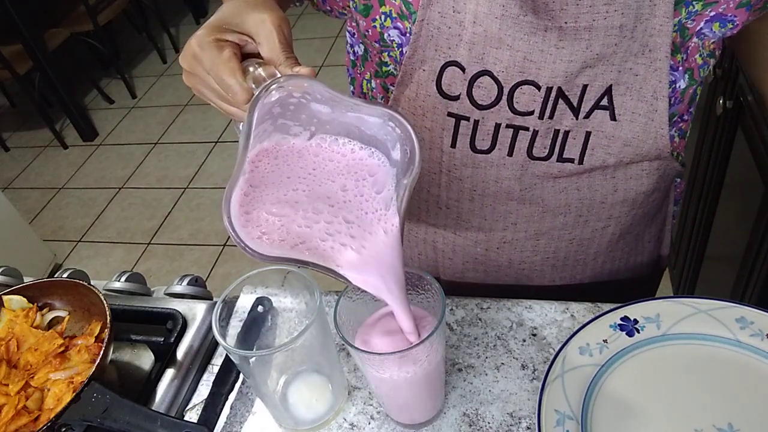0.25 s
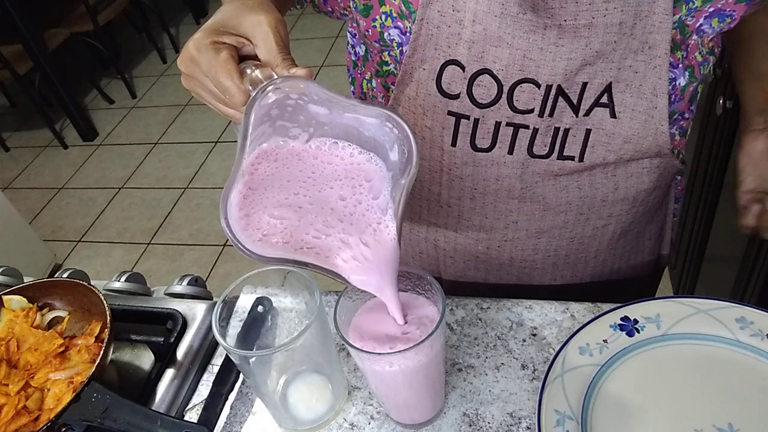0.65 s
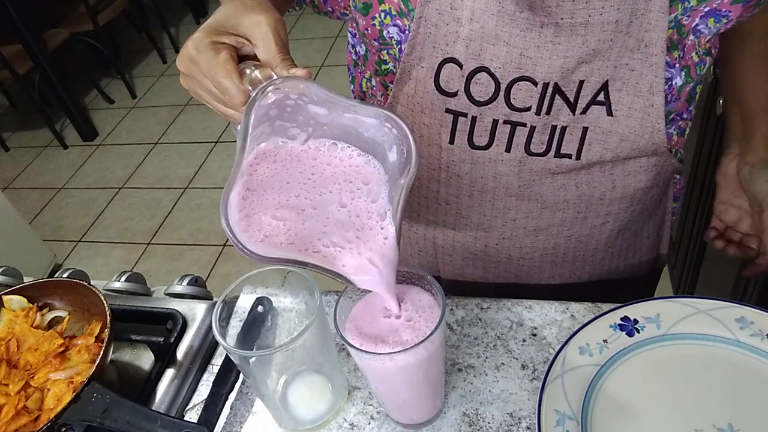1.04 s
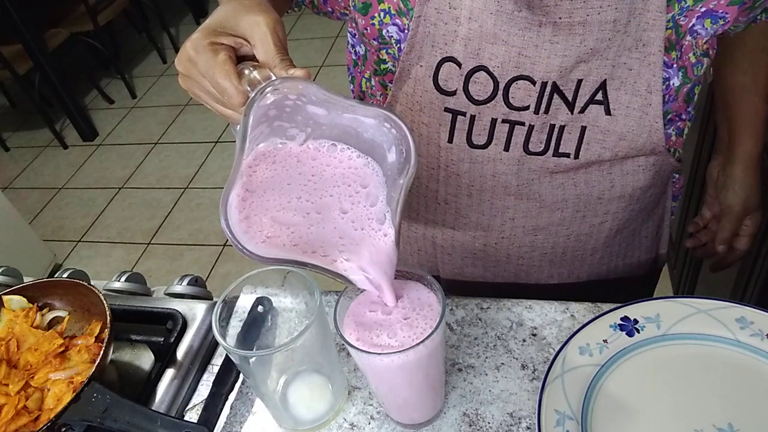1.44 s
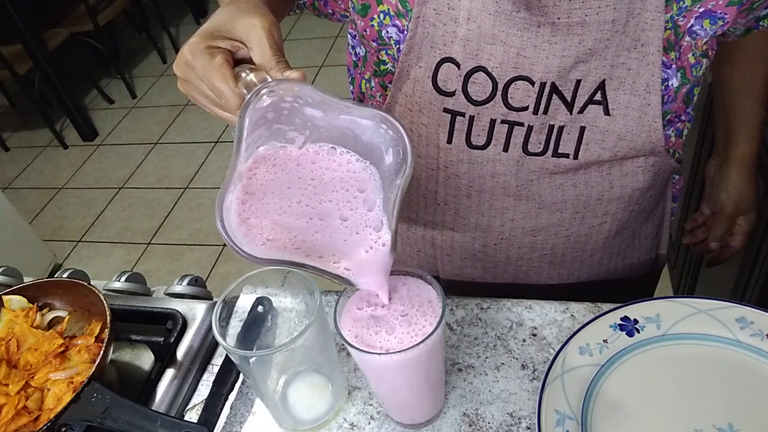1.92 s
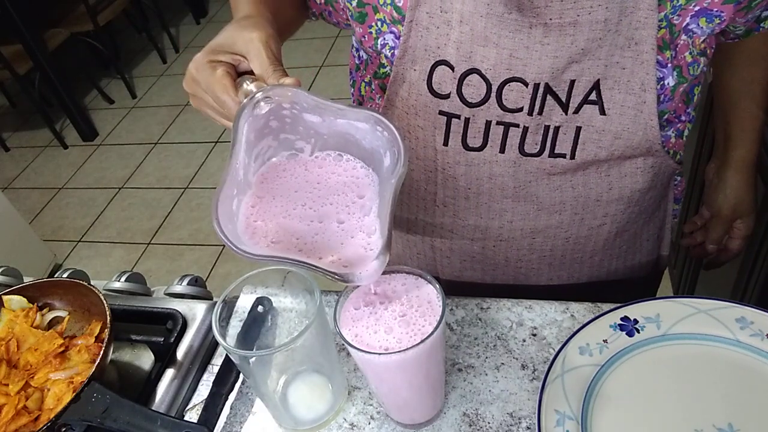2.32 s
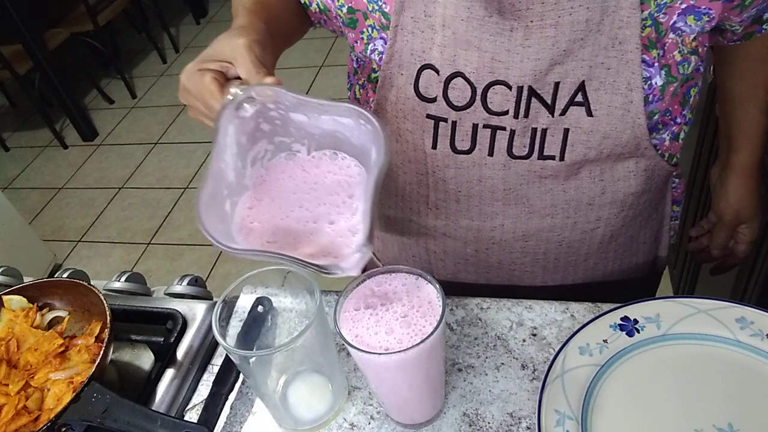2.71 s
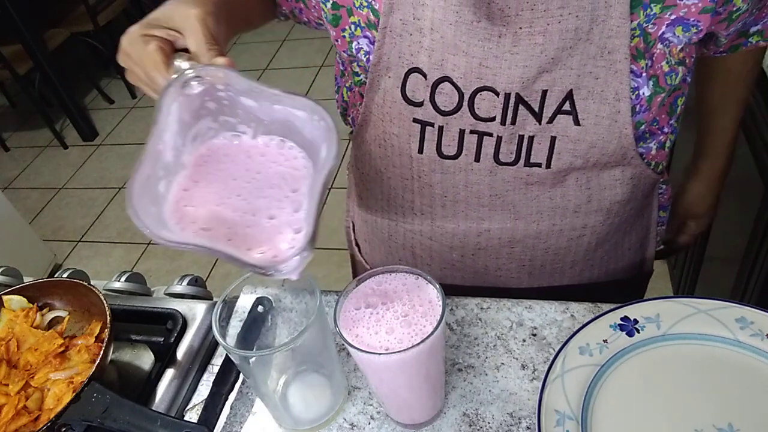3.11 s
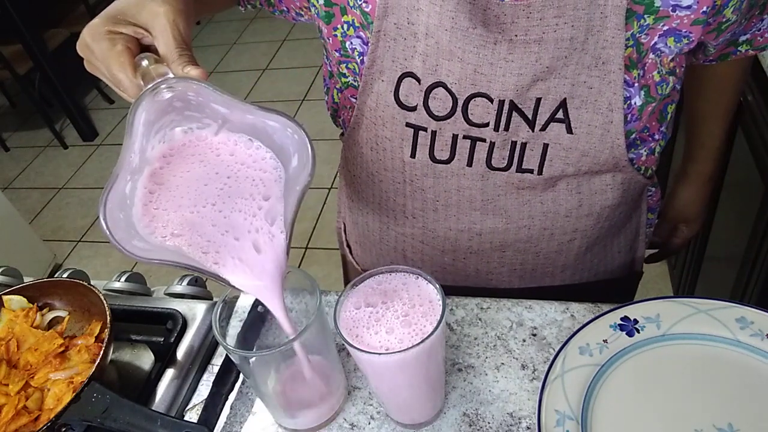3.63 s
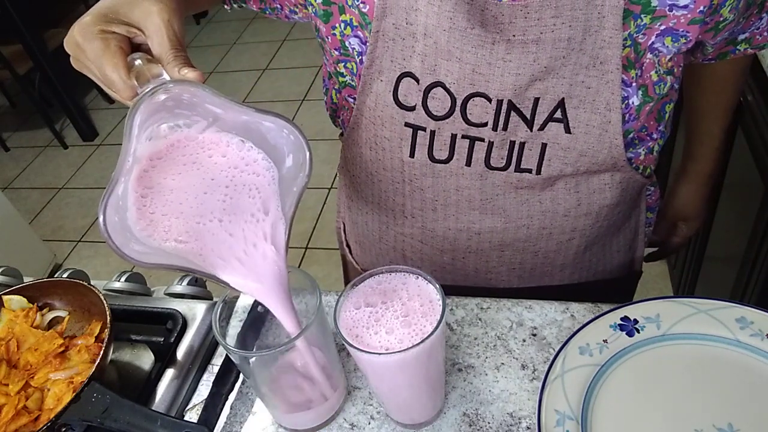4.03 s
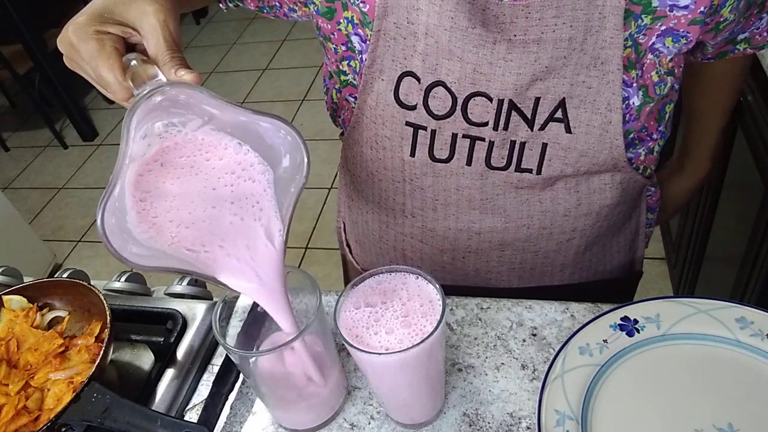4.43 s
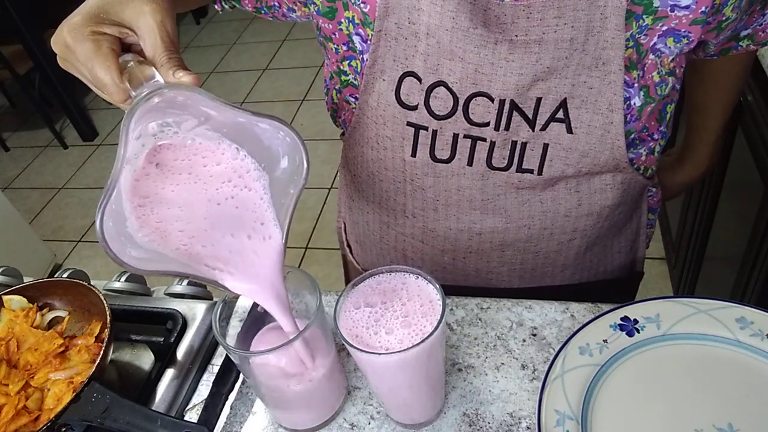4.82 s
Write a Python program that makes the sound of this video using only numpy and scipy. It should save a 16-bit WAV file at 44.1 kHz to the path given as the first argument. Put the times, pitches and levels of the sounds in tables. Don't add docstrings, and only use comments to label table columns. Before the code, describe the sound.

Over a steady beating appliance hum and faint ticking, a gentle foamy pour fades, plastic knocks glass, and a second pour starts with hollow plops.

```python
import sys
import numpy as np
from scipy import signal
from scipy.io import wavfile
from scipy.ndimage import uniform_filter1d

SR = 44100
rng = np.random.default_rng(int(sys.argv[2]) if len(sys.argv) > 2 else 0)


def ratio(d):
    e = np.asarray(d, float) / 20
    return 10 ** e


def materialize(psi):
    bounded = np.clip(np.atleast_2d(psi).T, -1, 1)
    quanta = np.round(bounded * 32767).astype(np.int16)
    wavfile.write(sys.argv[1], SR, quanta)


N = 222925

# (time [s], flow level [dB], air column [Hz])
POUR = [(0, -61, 910), (.1, -66, 873), (.2, -67, 865), (.4, -75, 830), (1.2, -76.5, 980),
        (1.75, -86.5, 920), (3.4, -78, 790), (3.6, -72, 755), (3.95, -74, 960), (4.1, -71.5, 978),
        (4.17, -67.5, 690), (4.3, -85, 713), (5.05, -76, 830)]
USUAL_FLOW_DB = -72
FIZZ_DB, FIZZ_SHARE, WASH_DB, WASH_SHARE = -75.5, 0.16, -74.5, 0.33
# (time [s], level [dB])
SLOSHES = [
    (2.18, -82),
    (2.96, -80.5),
]
SLOSH_S = 0.17
# (time [s], cavity note [dB], cavity pitch [Hz], smack [dB], slap [dB])
SPLATS = [(3.6683, -54.5, 1720, -54, -50.5), (3.736, -48.5, 1830, -50, -77), (3.806, -49, 1285, -54, -68),
          (3.866, -54.5, 1250, -55, -66), (3.9022, -37.5, 1760, -45.5, -46.5),
          (3.948, -51, 1720, -51, -61.5), (4.1318, -58, 1260, -59, -76), (4.28, -67, 1290, -64, -65),
          (4.2947, -69, 1150, -58.5, -73), (4.323, -51.5, 718, -60.5, -83), (4.521, -41.5, 800, -42, -43.5),
          (4.683, -63, 1170, -52, -61.5)]
CAVITY_CYCLES = 44
SPRAY_DB, CLICK_DB = -5.5, 13
BLOB_PAN_DB, BLOB_LAG_S = 2.2, .0001
# (time [s], level [dB], pitch [Hz])
BUBBLES = [
    (0.0716, -68, 1300),
    (0.171, -53.5, 1300),
    (0.1997, -58, 1330),
    (0.2297, -60, 1290),
    (3.915, -46, 1350),
    (4.113, -59, 1890),
]
# (time [s], slap level [dB], spray level [dB])
DROPLETS = [(0.8794, -76, -67.5), (1.55, -69, -67.5), (1.5664, -73, -74), (3.6812, -51.5, -43),
            (3.6675, -64, -57), (5.6, -70, -47), (4.6833, -76, -62), (4.177, -67, -73), (4.1905, -68, -69)]
# (frequency [Hz], level [dB], t60 [s])
GLASS_HOLLOW = [(1170, 0, 0.038), (1330, -9, 0.048), (1760, -8.5, 0.021), (2260, 0, 0.022),
                (2670, -4, 0.017)]
# (time [s], soft mode [dB], upper modes [dB], low body [dB], left minus right [dB])
KNOCKS = [
    (2.1096, -33.5, -47, -39.5, -2.5),
    (2.1143, -56, -50, -56, 13.5),
    (3.3977, -46, -63.5, -48.5, 3),
]
KNOCK_STIFF_DB = -5.5
# (time [s], stiff mode [dB], low body [dB])
TOUCHES = [(2.1814, -47, -50), (2.389, -59, -64), (2.7934, -51.5, -67), (2.834, -42.5, -53.5),
           (2.8806, -51, -58), (2.8996, -55, -60), (2.9436, -57, -56)]
TOUCH_SOFT_DB, TOUCH_UPPER_DB, TOUCH_PAN_DB = -18, -16, -2
# (frequency [Hz], level [dB], t60 [s])
JAR_STIFF = [(1275, 0, 0.043)]
JAR_SOFT = [(1133, 0, 0.042)]
JAR_UPPER = [(2160, 0.5, 0.072), (2052, 0.5, 0.062), (2580, -1, 0.048), (2527, -5, 0.053),
             (3547, -22, 0.18), (4930, -20, 0.15), (6000, -18, .05), (7849, -25, .07)]
JAR_LOW = [(529.4, 5, 0.055), (600, -13, 0.3), (835, 5, 0.026)]
# (time [s], peak level [dB], pitch [Hz])
THUMPS = [(2.111, -35.5, 360), (3.401, -37.5, 293), (3.402, -51, 400), (2.111, -36.5, 270),
          (3.404, -43.5, 600), (3.707, -39, 150), (3.7132, -37, 241), (3.714, -39, 290), (3.727, -33, 239),
          (3.717, -43.5, 337), (3.72, -49, 600), (3.903, -46, 602), (3.917, -50, 634)]
# (frequency [Hz], level [dB], t60 [s])
EMPTY_GLASS = (3.405, -71, [(1960, 0, .45)])
# (frequency [Hz], scraped level [dB], tapped level [dB], t60 [s])
RIM = [(4850, -10, -9, .08), (5850, 0, 0, .065), (7830, -16, -10, .1), (8600, -14, -8, .04),
       (11850, -3, -7, .045), (13200, -3, -10, .07), (14500, -20, -7, .04)]
# (time [s], level [dB])
SCRAPE = [(2.75, -140), (2.8, -101), (2.93, -98), (3.04, -92), (3.09, -95), (3.21, -98), (3.3, -140)]
# (time [s], level [dB])
RIM_TAP = (3.101, -63)
# (time [s], peak level [dB])
TICKS = [(0.0493, -64), (0.184, -61), (0.3147, -61), (0.4643, -62.5), (0.621, -62), (1.0211, -69),
         (1.3034, -69), (1.4311, -62), (1.7005, -64), (1.8133, -65), (1.9614, -64), (2.0931, -64),
         (2.2413, -61), (2.3735, -63), (2.5311, -65), (2.6653, -65), (2.8938, -64), (3.0514, -63),
         (4.0392, -61), (4.3146, -64), (4.4638, -65), (4.6099, -62), (4.7636, -65)]
# (time [s], speed [turns/s])
FAN = [(0, 28.971), (.337, 29.568), (.673, 28.815), (1.01, 29.366), (1.347, 29.387), (1.683, 29.726),
       (2.02, 29.796), (2.357, 29.511), (2.693, 29.518), (3.03, 29.236), (3.367, 29.643), (3.703, 29.512),
       (4.04, 28.911), (4.377, 29.51), (4.713, 29.655), (5.05, 29.922)]
# (multiple of shaft speed, level [dB], left minus right [dB], speed-up slope [dB per turn/s])
FAN_ORDERS = [(5, -54, 2, -5.), (2, -62.5, 5.5, 4), (4, -62, 0.5, -5.5)]
USUAL_SPEED = 29.45
COMPRESSOR_SPEED, FAN_LEAD = 29.032, .276
# (multiple of speed, level [dB], left minus right [dB])
COMPRESSOR_ORDERS = [(2, -65.5, 4.5), (4, -57.5, 1.5)]
# each [Hz], then the level
# of each [dB]
PAIR_HZ = (295.01, 296.22)
PAIR_DB = (-67.5, -64.5)
PAIR_IN_STEP_S, PAIR_PAN_DB = .479, -1
# (frequency [Hz], level [dB], lead on the compressor [turns])
SMALL_MOTOR = (59.234, -70.5, .516)
# (frequency [Hz], level [dB], left minus right [dB])
STEADY = [(88.5, -66, .2), (173.7, -68, 1.5), (196.7, -59, 3.2), (218.3, -63, 4.1), (694.4, -77, -4)]
# (frequency [Hz], level [dB per Hz])
AIR = [(15, -29), (25, -19.5), (91, -12.5), (148, -2), (210, -11), (260, -10), (314, -10.5), (434, -17.5),
       (705, -19), (1030, -26), (1350, -25.5), (1500, -28.5), (2430, -37), (6590, -48.5), (15600, -72)]
AIR_DB = -54.5
# (frequency [Hz], likeness [0..1])
LIKENESS = [(60, 1), (200, 0.79), (400, 0.95), (1000, 0.45), (3000, 0.22), (8000, 0.088), (15000, .45)]
AIR_LAG_S = 0.00039
# (time [s], level [dB])
DRAUGHT = [(0, 2), (.8, 1), (1.3, 1), (1.75, -3.5), (2.1, -0.5), (3.0, .5), (3.4, -4.5), (3.8, 3),
           (4.25, -3), (4.6, 1), (5.05, -1.5)]
# (frequency [Hz], t60 [s])
KITCHEN = [(300, 1), (1500, 0.44), (5000, 0.64), (12000, 0.45)]
EDGE_HZ = 15830


def pour():
    gurgle_db, column_hz = along(POUR)
    lump_size = ratio(2.2 * np.minimum(rng.exponential(1, N), 3))
    lumps = lump_size * (rng.random(N) < 900 / SR) * rng.choice([-1, 1], N)
    first = resonate(resonate(lumps, column_hz, 70), column_hz, 150)
    second = resonate(resonate(lumps, 1.45 * column_hz, 260), 1.42 * column_hz, 400)
    gurgle = ratio(gurgle_db) * (evened(first) + 0.28 * evened(second)) * sides(0.45)
    pops = ratio(1.75 * rng.exponential(1, (2, N))) * rng.standard_normal((2, N))
    treble = signal.butter(3, 9500, "highpass", fs=SR, output="sos")
    fizz = evened(signal.sosfilt(treble, pops))
    return gurgle + ratio(FIZZ_DB + FIZZ_SHARE * (gurgle_db - USUAL_FLOW_DB)) * fizz


def stream():
    size = ratio(2.0 * np.minimum(rng.exponential(1, (2, N)), 5))
    grains = size * rng.standard_normal((2, N)) * (rng.random((2, N)) < .08)
    dull = signal.butter(2, [350, 3200], "bandpass", fs=SR, output="sos")
    flow = ratio(WASH_DB + WASH_SHARE * (along(POUR)[0] - USUAL_FLOW_DB))
    t = np.arange(N) / SR
    slosh = sum(ratio(db) * np.exp(-((t - s) / SLOSH_S) ** 2) for s, db in SLOSHES)
    return (flow + slosh) * evened(signal.sosfilt(dull, grains))


def splats():
    out = np.zeros((2, N))

    def place(s, sound):
        add(out, s, sound, BLOB_PAN_DB, lag_s=BLOB_LAG_S)

    click_band = signal.butter(2, [1500, 12000], "bandpass", fs=SR, output="sos")
    click = signal.sosfilt(click_band, signal.unit_impulse(256))
    for s, db, hz in BUBBLES:
        place(s, ratio(db) * ring([(hz, -1, .035), (0.85 * hz, -4, .03)], rise_s=0.00098))
    for s, db, hz, smack_db, slap_db in SPLATS:
        place(s, ratio(db + .5) * ring([(hz, 0, CAVITY_CYCLES / hz)], rise_s=0.0012))
        place(s + .0005, ratio(slap_db + CLICK_DB) * click)
        struck = ratio(rng.uniform(-1, 0, len(GLASS_HOLLOW)))
        hollow = sum(g * ring([mode], rise_s=0.0028)[:2048] for g, mode in zip(struck, GLASS_HOLLOW))
        smack = burst(750, 2730, 0.049, same=0.37, snap=0.)
        place(s, ratio(smack_db - 3.0) * smack + ratio(smack_db - 4.0) * hollow)
    blob_sprays = [(s, slap_db, slap_db + SPRAY_DB) for s, _, _, _, slap_db in SPLATS]
    for s, slap_db, spray_db in DROPLETS + blob_sprays:
        slap = burst(2900, 7200, 0.021, same=0.13, snap=0.26)
        spray = burst(9700, 14800, 0.036)
        place(s, ratio(slap_db) * slap + ratio(spray_db) * spray)
    return out


def jar():
    out = np.zeros((2, N))
    bodies = [ring(modes, rise_s=0.003) for modes in (JAR_STIFF, JAR_SOFT, JAR_UPPER, JAR_LOW)]
    blows = [(s, soft + KNOCK_STIFF_DB, soft, upper, low, pan) for s, soft, upper, low, pan in KNOCKS]
    blows += [(s, stiff, stiff + TOUCH_SOFT_DB, stiff + TOUCH_UPPER_DB, low, TOUCH_PAN_DB)
              for s, stiff, low in TOUCHES]
    for s, stiff, soft, upper, low, pan_db in blows:
        levels_db = np.array([stiff, soft, upper, low])
        add(out, s - .001, ratio(levels_db - 2.0) @ bodies, pan_db, lag_s=.00005)
        add(out, s, ratio(soft - 11) * burst(250, 1200, .04, same=.8, snap=0.), pan_db)
        add(out, s, ratio(upper - 27) * burst(2600, 8500, 0.035, snap=0.), pan_db)
    for s, db, hz in THUMPS:
        add(out, s, ratio(db) * ring([(hz, 0, .045)], rise_s=.003))
    s, db, modes = EMPTY_GLASS
    add(out, s, ratio(db) * ring(modes))
    return out


def rim():
    slips = ratio(along(SCRAPE)[0]) * (rng.random(N) < 4000 / SR) * rng.standard_normal(N)
    tap_s, tap_db = RIM_TAP
    tap = ratio(tap_db) * (np.arange(N) == round(tap_s * SR))
    modes = []
    for hz, scraped_db, tapped_db, t60 in RIM:
        force = ratio(scraped_db) * slips + ratio(tapped_db) * tap
        modes.append(signal.oaconvolve(force, ring([(hz, 0, t60)], rise_s=.0006))[:N])
    angle = rng.uniform(.3, 1.2, len(RIM))
    out = np.array([np.cos(angle), np.sin(angle)]) @ modes
    add(out, tap_s, ratio(tap_db - 5.0) * burst(1800, 14500, .02))
    return out


def ticks():
    out = np.zeros((2, N))
    for s, db in TICKS:
        add(out, s, ratio(db - 6.5) * burst(10500, 12600, 0.026), .6)
    return out


def hum():
    t = np.arange(N) / SR
    speed = along(FAN)[0]
    turns = np.cumsum(speed) / SR + FAN_LEAD
    fan = sum(sides(pan) * ratio(db + slope_db * (speed - USUAL_SPEED)) * np.sin(2 * np.pi * k * turns)
              for k, db, pan, slope_db in FAN_ORDERS)
    compressor = sum(sides(pan) * ratio(db) * np.sin(2 * np.pi * k * COMPRESSOR_SPEED * t)
                     for k, db, pan in COMPRESSOR_ORDERS)
    pair = sum(ratio(db) * np.sin(2 * np.pi * hz * (t - PAIR_IN_STEP_S)) for hz, db in zip(PAIR_HZ, PAIR_DB))
    lines = sum(sides(pan) * ratio(db) * np.sin(2 * np.pi * (hz * t + rng.random())) for hz, db, pan in STEADY)
    motor_hz, motor_db, motor_lead = SMALL_MOTOR
    motor = ratio(motor_db) * np.sin(2 * np.pi * (motor_hz * t + motor_lead))
    return np.sqrt(2) * (motor + fan + compressor + sides(PAIR_PAN_DB) * pair + lines)


def air():
    frames, hz = N // 512 + 5, np.fft.rfftfreq(2048, 1 / SR)
    a, b, c, d, patches = rng.standard_normal((frames, 1025, 5)).T
    patches = uniform_filter1d(patches, size=20, axis=0)
    patches = evened(uniform_filter1d(patches, size=8, axis=1))
    same = np.clip(read(LIKENESS, hz), 0, 1)[:, None]
    right = a + 1j * b
    late = np.exp(-2j * np.pi * hz * AIR_LAG_S)[:, None]
    left = same * late * right + np.sqrt(1 - same ** 2) * (c + 1j * d)
    frame_s = (np.arange(frames) - 1) * 512 / SR
    draught_db = np.interp(frame_s, *np.transpose(DRAUGHT)) / (1 + (hz[:, None] / 700) ** 2)
    z = np.array([left, right]) * ratio(read(AIR, hz)[:, None] + 0.6 * patches + draught_db)
    sound = signal.istft(z, nperseg=2048, noverlap=1536)[1][:, :N]
    return sides(0.25) * ratio(AIR_DB) * evened(sound)


def kitchen(x):
    taps = np.zeros((2, SR // 2))
    at = np.arange(100, SR // 2 - 20, 20)
    at = at + rng.integers(0, 20, (2, len(at)))
    np.put_along_axis(taps, at, rng.choice([-1., 1.], at.shape), 1)
    hz, t, z = signal.stft(taps, SR, nperseg=256)
    decay = ratio(-60 * t / read(KITCHEN, hz)[:, None])
    tail = signal.istft(z * decay, SR, nperseg=256)[1]
    tail = tail / np.linalg.norm(tail[0])
    return signal.fftconvolve(x.mean(0)[None], tail, axes=1)[:, :N]


def ring(modes, rise_s=0.0012):
    t = np.arange(SR // 3) / SR
    sound = sum((-1) ** k * ratio(db - 60 * t / t60) * np.sin(2 * np.pi * hz * t)
                for k, (hz, db, t60) in enumerate(modes))
    return sound * np.sin(np.pi / 2 * np.minimum(t / rise_s, 1)) ** 2


def burst(lo_hz, hi_hz, t60, same=0.043, snap=0.74):
    band = signal.butter(2, [lo_hz, min(hi_hz, SR / 2 - 1)], "bandpass", fs=SR, output="sos")
    a, b = rng.standard_normal((2, 2048))
    noise = np.array([a, same * a + np.sqrt(1 - min(same, 1) ** 2) * b])
    t = np.arange(2048) / SR
    return evened(signal.sosfilt(band, noise)) * (ratio(-60 * t / t60) + snap * np.exp(-t / 0.00032))


def resonate(x, hz, width_hz):
    turn = np.exp(2j * np.pi * np.cumsum(hz * np.ones(x.shape[-1])) / SR)
    r = np.exp(-np.pi * width_hz / SR)
    return 2 * (turn * signal.lfilter([1 - r], [1, -r], x / turn)).real


def add(mix, s, sound, pan_db=0., lag_s=0.):
    waves = sound * np.ones((2, 1))
    for side, late, db, wave in zip(mix, (lag_s, 0), (pan_db / 2, -pan_db / 2), waves):
        part = side[round((s + late) * SR):][:len(wave)]
        part += ratio(db) * wave[:len(part)]


def sides(pan_db):
    return ratio(np.array([[pan_db / 2], [-pan_db / 2]]))


def evened(x):
    return x / np.sqrt(np.mean(x ** 2) + 1e-20)


def read(points, hz):
    f, value = np.transpose(points)
    return np.interp(np.log(hz + 1), np.log(f + 1), value)


def along(rows):
    s, *columns = np.transpose(rows)
    return [np.interp(np.arange(N) / SR, s, c) for c in columns]


def scene():
    near = splats() + jar() + rim() + ticks()
    bed = ratio(-7.5) * kitchen(near) + pour() + stream() + hum() + air()
    edge = signal.firwin(2047, EDGE_HZ, window=("kaiser", 9), fs=SR)
    return near + signal.oaconvolve(bed, edge[None], "same")


def roll_off(x):
    return signal.sosfilt(signal.butter(12, 16410, fs=SR, output="sos"), x)


def record(dry):
    edge = signal.firwin(127, 16000, window=("kaiser", 7), fs=SR)
    return roll_off(signal.oaconvolve(dry, edge[None], "same"))


dry = scene()
out = record(dry)
materialize(out)
```